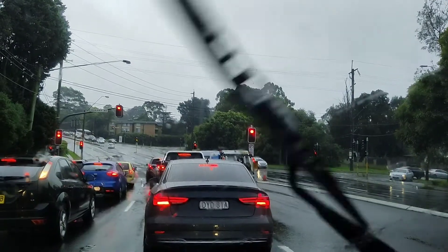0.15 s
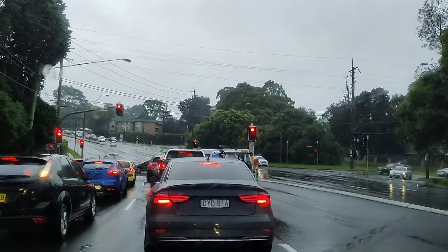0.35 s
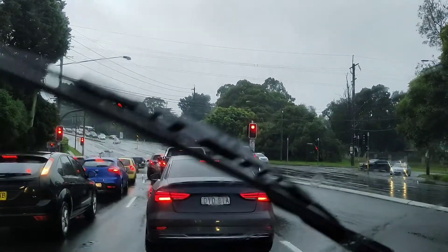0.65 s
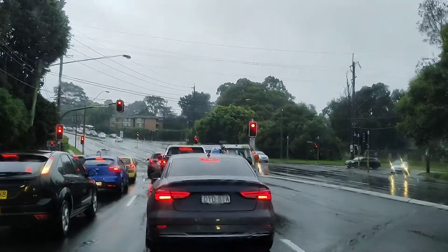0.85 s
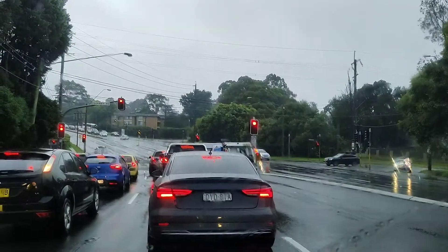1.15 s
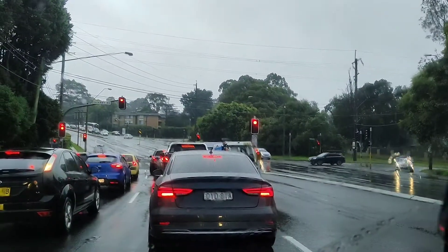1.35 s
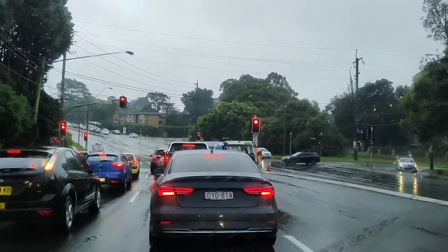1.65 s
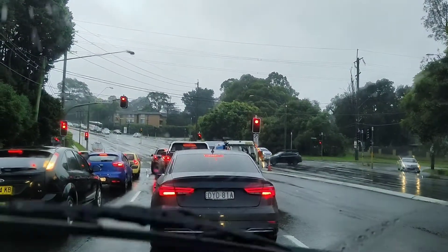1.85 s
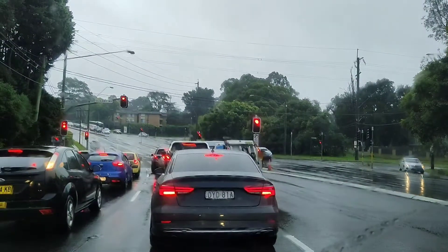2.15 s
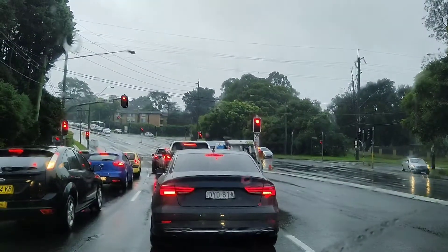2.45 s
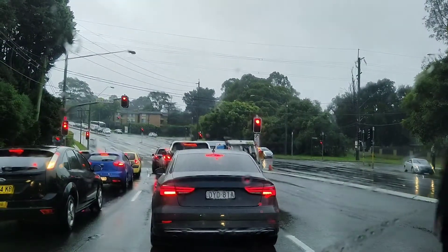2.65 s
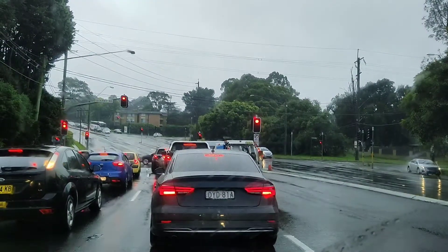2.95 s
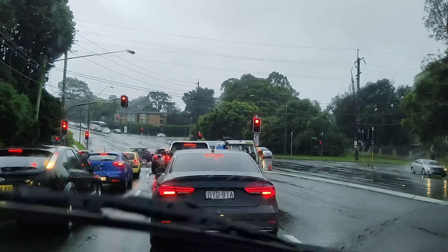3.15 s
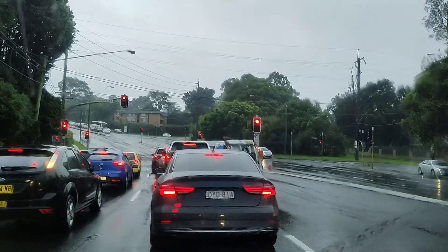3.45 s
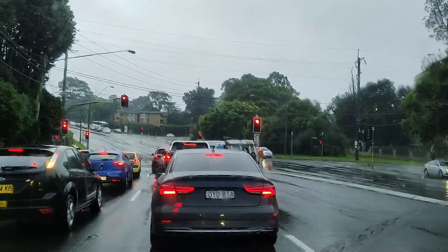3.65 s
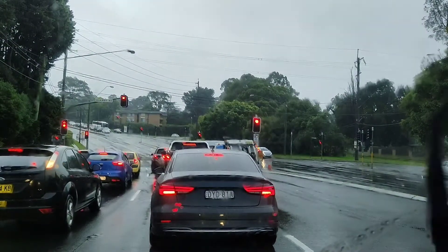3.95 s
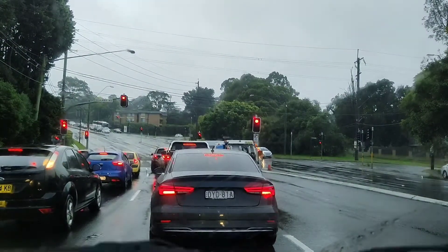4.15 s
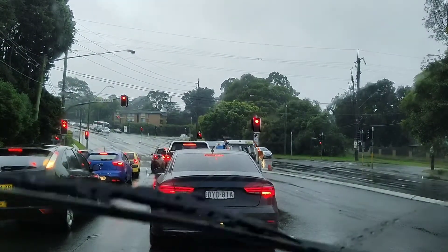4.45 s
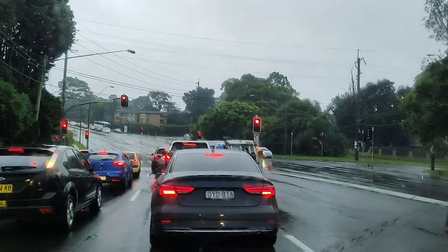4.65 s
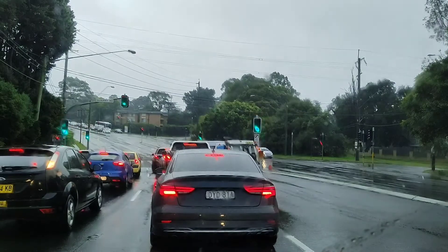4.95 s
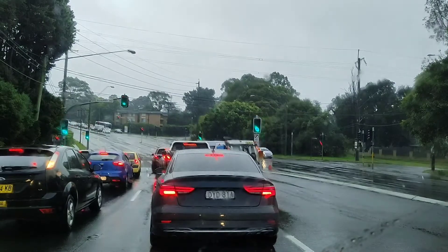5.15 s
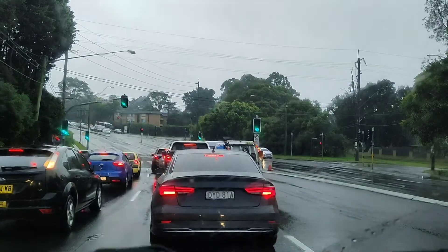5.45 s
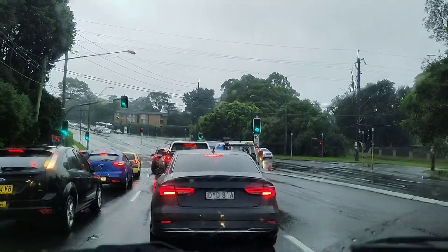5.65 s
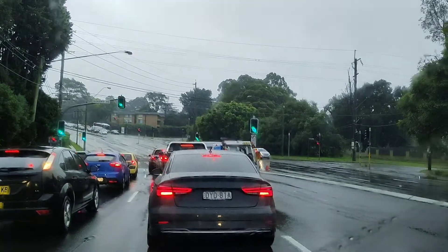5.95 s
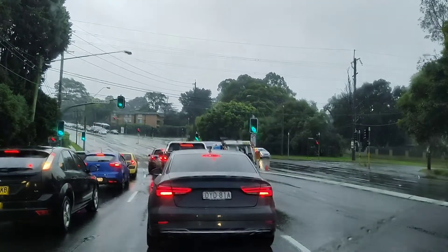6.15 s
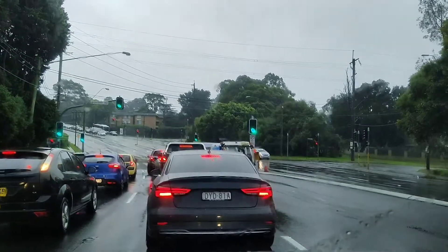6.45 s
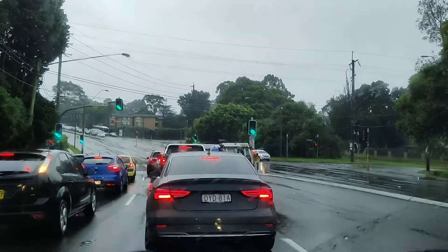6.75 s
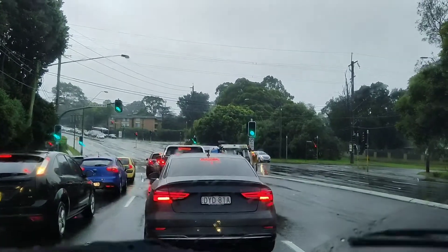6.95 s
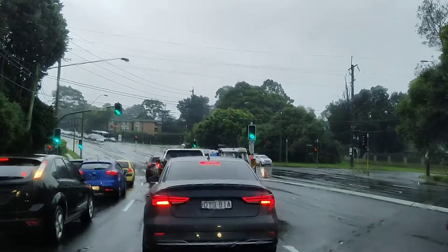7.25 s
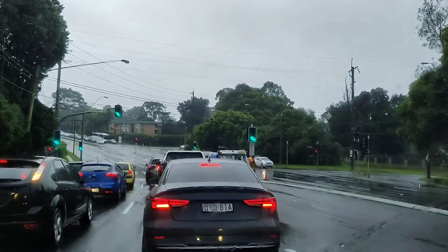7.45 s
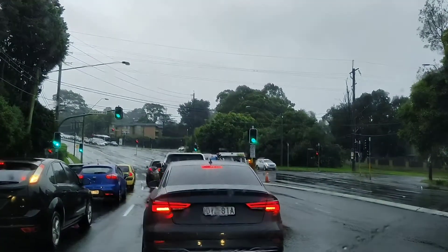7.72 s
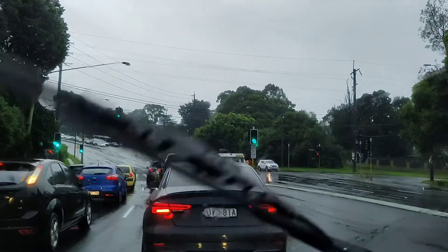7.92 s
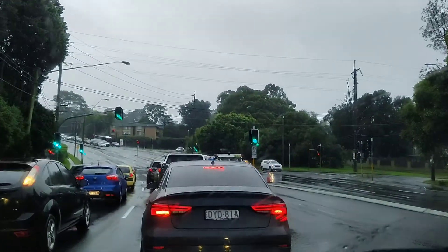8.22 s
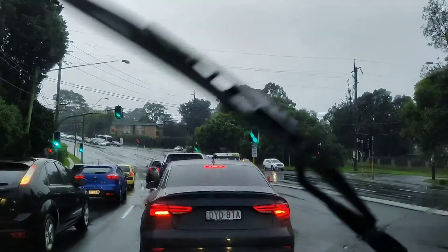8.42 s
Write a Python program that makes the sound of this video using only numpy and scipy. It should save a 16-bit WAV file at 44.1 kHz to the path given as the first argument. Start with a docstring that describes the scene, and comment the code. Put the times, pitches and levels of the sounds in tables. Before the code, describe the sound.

Close, dry car interior in rain, stationary, with a low wavering engine boom near 50 Hz and soft blower rush throughout, plus a very faint whine. A soft wiper rebound opens it, with small finger clicks on the right at 0.13 to 0.23 s. The wiper rubber judders briefly and the arms thump, bounce and rattle at about 1.2, 2.5, 3.8, 5.05, 6.35 and 7.65 s, the last two strongest. Midway between thumps come a small linkage knock, a low motor hum that swells, and two dull blade turns; wet blades hiss faintly. Sparse drops tick at 0.5, 1.6, 3.05, 4.9, 5.8, 6.3 and 6.9 s. Soft skin brushing starts near 6.35 s, then finger taps thicken from 6.5 to 7.55 s, with a stick-slip creak slowing from 6.9 to 7.4 s, close right. A last touch comes at 7.8 s; right-side treble becomes duller until the end at about 8.6 s.

```python
"""A last soft rebound of the wiper arms opens on an idling car in the rain, engine and blower underneath.
Fingers tap, brush and later creak on the phone: uneven slips drive its case, mostly at the right port.
The wipers cycle about every 1.3 s: at the top the rubber judders over on its edge (filtered impacts), then
the arms thump and rebound (short pushes into damped modes); at the bottom two dull blade turns and a
labouring linkage (filtered noise and hum). A few drops tick on the glass as brief noise bursts."""
import sys
import numpy as np
from scipy import signal
from scipy.fft import rfft, irfft
from scipy.io import wavfile
from scipy.ndimage import uniform_filter1d

SR = 44100
rng = np.random.default_rng(int(sys.argv[2]) if len(sys.argv) > 2 else 0)


def transcribe(u):
    """Save the signal u as a 16-bit wav file named by the first command-line argument.

    u: samples, shape (n,) or (channels, n), limited to [-1, 1]; the rate is SR.
    q: integer samples, one column per channel.
    """
    v = np.clip(np.atleast_2d(u).T, -1, 1)
    q = np.round(v * 32767).astype(np.int16)
    wavfile.write(sys.argv[1], SR, q)


N = 378598
TIME = np.arange(N) / SR

# engine and blower spectrum: f/Hz, level/dB
BLOWER_SPECTRUM = [(24, -1), (33, 0.5), (48, -1), (64, -0.5), (80, -14), (105, -3.5), (300, -15),
                   (650, -27.5), (1200, -30), (2300, -29), (3050, -27), (4100, -38), (5200, -60),
                   (6200, -53.5), (8000, -73)]
# airy top of the blower: f/Hz, level/dB
AIR_SPECTRUM = [(7000, -41), (8500, -5), (10200, 0), (12000, -10), (15000, -19)]
# balance of the two ports: f/Hz, left minus right/dB
PORT_BALANCE = [(100, 0.5), (500, 3.5), (1000, -0.5), (1600, 0.5), (2300, 0.5), (3100, -11), (4500, -7),
                (6200, -14.5), (9000, -1.5)]

# one row per wiper cycle, from the flip at the top of the sweep: flip t/s, grip held/s, landing t/s,
# landing level/dB, contact time/s, rebound level/dB, first blade's bottom turn level/dB,
# second blade's bottom turn level/dB, linkage load level/dB
STROKES = [(-.09, .02, -.058, -9, .0018, -8, -43, -42, 0),
           (1.172, .022, 1.211, -.5, .0012, -13, -42, -45, 1),
           (2.467, .015, 2.487, -2, .0005, -8, -42.5, -46, -1.5),
           (3.752, .02, 3.78, -4, .0011, -10, -42, -46, 0),
           (5.04, .021, 5.056, -3, .0008, -3.5, -44, -44.5, -1.5),
           (6.33, .022, 6.363, 0, .0014, -10, -40, -39, 1.5),
           (7.616, .02, 7.645, 1, .0018, -7, -42, -34, 2.5)]
# windscreen and cabin modes: f/Hz, t60/s, left level/dB, right level/dB
SCREEN_MODES = [(92.6, 0.3, -17.5, -26.5), (129.9, 0.28, -10, -17.5), (164.7, 0.25, -8.5, -15.5),
                (213.2, 0.14, 1, -4), (251.4, 0.059, 0.5, -8.5), (303, 0.075, -20.5, -8),
                (360.4, 0.096, -3.5, -7), (476, .08, -11.5, -11.5), (614, .05, -11.5, -20),
                (793, 0.12, -5, -4.5), (868, 0.12, -5, -13.5)]
# dull shudder of the rubber-mounted arms: f/Hz, level/dB
SHUDDER_SPECTRUM = [(70, -11), (115, 1.5), (230, 0), (370, -7), (490, -12), (680, -23.5), (850, -20.5),
                    (1300, -37.5), (4000, -66)]
# rattle of the arms and turning of the blades: f/Hz, level/dB
ARM_SPECTRUM = [(110, -12), (190, -4), (270, 4), (380, -6.5), (500, -3), (680, -22.5), (850, -6.5),
                (1150, -25), (1700, -12), (3000, -35.5), (6000, -83)]
# rumble of the wiper linkage: f/Hz, level/dB
LINKAGE_SPECTRUM = [(70, -37), (110, -10.5), (150, 6), (185, 5.5), (230, -1.5), (330, -11), (480, -15),
                    (700, -30.5), (1500, -62)]
# blade and arm modes: f/Hz, t60/s, left level/dB, right level/dB
BLADE_MODES = [(372, 0.14, -19, -10), (462, 0.14, -4.5, -2.5), (735, 0.021, -5.5, -18),
               (839, 0.058, -0.5, -1), (1606, 0.037, 4.5, -12), (1822, 0.014, 6, 3), (1940, 0.076, -7, -7),
               (2496, 0.026, -33, -8), (2884, .04, -4.5, -17.5), (3078, 0.044, -12.5, -8.5),
               (3200, 0.044, -15, -8.5), (4430, 0.11, -23, -21.5), (5700, 0.044, -40.5, -32)]
# rubber scrubbing over on the glass: f/Hz, level/dB
SCRUB_SPECTRUM = [(70, -28), (150, -18), (235, 11.5), (310, -2), (490, -1.5), (610, -11), (790, 0.5),
                  (1080, -14), (1650, -6), (2350, -11), (3150, -13), (4200, -23.5), (5300, -40),
                  (6100, -40), (8000, -54), (15000, -70)]

# heavier drops on the glass: t/s, level/dB
DROPS = [(.4975, -20), (1.583, -33), (1.690, -31), (3.053, -31), (4.866, -33), (4.963, -34), (5.83, -27),
         (6.318, -19), (6.914, -18)]
# splash of a drop: f/Hz, level/dB
SPLASH_SPECTRUM = [(1000, -5), (2800, -16.5), (3900, 4), (5000, -12.5), (6200, -7), (8000, -21.5),
                   (15000, -34.5)]

# fingers on the phone: t/s, click level/dB, thud level/dB, time scale of the run of slips/s
TAPS = [(0.1348, 1, -3.5, 0.00003), (0.144, -24, -8.5, 0.0022), (.229, -29, -12, 0.0019),
        (6.504, -16, -13.5, 0.0032), (6.746, -14, -7, 0.0066), (6.812, -7, -4, 0.0056),
        (6.912, -10, -26, 0.0001), (7.012, -11, -5, 0.0025), (7.058, -4, -1, 0.0084),
        (7.122, -16, -1, 0.0015), (7.141, -11, -1, .002), (7.215, -5.5, 2, .004), (7.258, -4, 5, 0.0042),
        (7.348, -9.5, 1, 0.0039), (7.378, -2, 5.5, 0.0056), (7.488, -13, -4.5, .001),
        (7.512, -11, -6, 0.00056), (7.537, -16, -5.5, .005), (7.809, -16.5, -10, 0.000775)]
# sharp part of a touch: f/Hz, level/dB
CLICK_SPECTRUM = [(200, -24.5), (780, 8.5), (1200, 1.5), (2100, 1), (3100, -5.5), (4600, -13),
                  (6100, -18.5), (8200, -44), (11000, -17.5), (13000, -29), (15500, -50)]
# soft part of a touch: f/Hz, level/dB
THUD_SPECTRUM = [(60, -19.5), (150, -11), (215, -1.5), (330, -0.5), (470, -7.5), (680, -7), (1100, -17.5),
                 (3000, -68.5)]
# skin slides on the case: t/s, level/dB, half length/s
BRUSHES = [(.148, -48, 0.015), (.55, -56.5, 0.068), (.9, -53, .03), (6.354, -43.5, 0.044),
           (6.52, -40.5, 0.019), (6.58, -47, 0.038), (6.752, -39, 0.019), (6.821, -37, 0.014),
           (7.006, -57.5, 0.26), (7.27, -42.5, 0.017)]
# hiss of sliding skin: f/Hz, level/dB
SKIN_SPECTRUM = [(500, 1.5), (2000, 2.5), (4000, 1), (5200, -12), (6300, -10), (8500, -27), (11000, -18),
                 (12700, -22), (15000, -30)]
# the phone's case rings briefly after a touch: f/Hz, t60/s, left level/dB, right level/dB
CASE_MODES = [(209, 0.083, -43, -18), (302, 0.057, -47, -19.5), (780, 0.017, -42, -7.5),
              (1480, .005, -33, -1), (2020, 0.0058, -49, -6.5), (3000, 0.0079, -32, -6.5),
              (6050, 0.006, -50, -23), (11080, 0.0042, -56, -22.5)]
# a finger comes to rest over the right port: t/s, share covered
COVER = [(6.9, 0), (7.4, 0.45), (7.75, 0.95), (8.58, 1)]

# after landing the arm bounces once (level relative to the landing), then rebounds softly and rattles
BOUNCE_S, BOUNCE_DB, BOUNCE_CONTACT_S = .018, -7, .0019
REBOUND_S, REBOUND_CONTACT_S, SHUDDER_S = .058, .0036, .037
RATTLE_DB, RATTLE_S = -42, .022
# the linkage knocks as it takes up its play, counted from the flip
PLAY_S, PLAY_DB, PLAY_CONTACT_S = .666, -15.5, .0013
# the two blades turn at the bottom one after the other, counted from the flip
FIRST_TURN_S, SECOND_TURN_S, TURN_HALF_S = .675, .738, .028
# the linkage rumbles least at the top and labours as it starts to lift the arms again
RUMBLE_DB, SWING_DB = -51, 6
LIFT_DB, LIFT_ATTACK_S, LIFT_RELEASE_S = -45, .03, .17
# the blades rub all the time and swish at mid-glass, down then up: t after the flip/s, level/dB, half length/s
FRICTION_DB, SWISHES = -56.5, [(.41, -54, .04), (.97, -59, .06)]
# the rubber takes hold and lets go
FLIP_DB, FLIP_ATTACK_S, FLIP_RELEASE_S = -24, .011, .021
# skin sticks and slips on the case at a slowing rate
CREAK_START_S, CREAK_END_S = 6.925, 7.42
SLIPS_PER_S, SLOWING_S = 108, .36
# the sharp edge of the slips fades first; their soft push comes later and lasts
CREAK_CLICK_DB, CREAK_FADE_DB_PER_S = -8.5, 34
CREAK_THUD_DB, CREAK_PUSH_S, CREAK_ATTACK_S, CREAK_RELEASE_S = -10.5, 7.02, .09, .29
TOP_HZ = 15700  # upper limit of the phone


def amp(db):
    """Decibels to gain."""
    return 10 ** (np.asarray(db) / 20)


def unit(x):
    """Scale to rms 1."""
    return x / np.sqrt(np.mean(x ** 2))


def convolve(x, response):
    """Send a sound through one response, or one per ear."""
    return signal.fftconvolve(np.atleast_2d(x), np.atleast_2d(response), axes=1)[:, :N]


def shape(points, hz):
    """Read (f/Hz, level/dB) points on a log-frequency axis."""
    f, db = np.transpose(points)
    return np.interp(np.log(hz + 1), np.log(f), db)


def colour(x, points, size=8192):
    """Causal (minimum-phase) filter of unit energy that follows the given spectrum."""
    level_db = shape(points, np.fft.rfftfreq(size, 1 / SR))
    cepstrum = irfft(np.log(amp(level_db)))
    # folding the cepstrum forward in time makes the filter causal
    cepstrum[1:size // 2] *= 2
    cepstrum[size // 2 + 1:] = 0
    response = irfft(np.exp(rfft(cepstrum)))
    return convolve(x, response / np.linalg.norm(response))


def ring(x, modes):
    """Damped modes, each with its own strength at the two ears; unit energy on average per ear."""
    t = TIME[:SR // 2]
    response = 0
    for k, (hz, t60, left, right) in enumerate(modes):
        decay = np.exp(-np.log(1000) * t / t60)
        sign = (-1) ** k  # neighbouring modes start in opposite directions
        response = response + sign * amp([[left], [right]]) * np.sin(2 * np.pi * hz * t) * decay
    return convolve(x, response / np.sqrt(np.sum(response ** 2) / 2))


def diffuse(pair, split_hz):
    """Two unrelated sounds as a cabin field: bass alike at both ports, treble unrelated, port-coloured."""
    hz = np.fft.rfftfreq(N, 1 / SR)
    alike = 1 / (1 + (hz / split_hz) ** 2)
    mid, side = rfft(pair)
    sign = np.array([[1], [-1]])
    field = mid * np.sqrt((1 + alike) / 2) + sign * side * np.sqrt((1 - alike) / 2)
    port_gain = amp(sign * shape(PORT_BALANCE, hz) / 2)
    return irfft(field * port_gain, N)


def noise(channels=2):
    """White noise."""
    return rng.standard_normal((channels, N))


def walk(rate):
    """Smooth random wander of rms 1, with about rate new values per second."""
    k = int(SR / rate)
    steps = rng.standard_normal(N)[np.arange(N) // k]
    return unit(uniform_filter1d(uniform_filter1d(steps, k), k))


def grit(rate, spread_db):
    """Random tiny impacts of uneven size, rate per second, brought to rms 1."""
    hits = rng.random((2, N)) < rate / SR
    return unit(hits * noise() * amp(spread_db * noise()))


def fade(start, length):
    """An envelope that jumps to 1 and dies away."""
    age = TIME - start
    return (age >= 0) * np.exp(-np.clip(age / length, 0, 50))


def press(start, attack, hold, release):
    """An envelope that has risen to 1 at its start, holds, and lets go."""
    age = TIME - start
    rise = (np.minimum(age, 0) / attack) ** 2
    fall = (np.maximum(age - hold, 0) / release) ** 2
    return np.exp(-rise - fall)


def swells(table):
    """Bell-shaped envelopes from rows of t/s, level/dB, half length/s."""
    return sum(amp(db) * np.exp(-((TIME - s) / half) ** 2) for s, db, half in table)


def wavering_tone(hz, drift, rate):
    """A sine whose pitch wanders by a fraction drift (rms)."""
    return np.sin(2 * np.pi * np.cumsum(hz * (1 + drift * walk(rate))) / SR)


def engine():
    """The idling engine booms as one low tone, wavering in pitch and level."""
    return amp(2 * walk(5.7)) * wavering_tone(48.6, drift=.015, rate=6.7)


def blower():
    """Unsteady broadband cabin noise under a steady airy top."""
    rush = amp(-41.0) * colour(noise() * amp(1.9 * walk(9)), BLOWER_SPECTRUM)
    air = amp(-89) * colour(noise(), AIR_SPECTRUM)
    return diffuse(rush + air, split_hz=610)


def blower_whine():
    """The blower whines faintly on one wavering tone."""
    return amp(1.3 * walk(5)) * wavering_tone(1090, drift=0.0037, rate=6)


def cabin():
    """Engine and blower, the whine a little stronger at the right."""
    return blower() + amp(-48.5) * engine() + amp([[-78], [-71]]) * blower_whine()


def blows():
    """Landing, bounce, rebound and linkage knock of each cycle: rows of t/s, level/dB, contact time/s."""
    rows = []
    for flip, _, landing, db, contact, rebound_db, *_ in STROKES:
        rows += [(landing, db, contact),
                 (landing + BOUNCE_S, db + BOUNCE_DB, BOUNCE_CONTACT_S),
                 (landing + REBOUND_S, rebound_db, REBOUND_CONTACT_S),
                 (flip + PLAY_S, PLAY_DB, PLAY_CONTACT_S)]
    return rows


def thumps():
    """Each blow pushes the windscreen; the rubber-mounted arms shudder dully after it."""
    push, shudder = np.zeros(N), np.zeros(N)
    for s, db, contact in blows():
        # half-sine force; a shorter contact is stronger, so the impulse depends on level alone
        force = np.sin(np.pi * np.clip((TIME - s) / contact, 0, 1))
        push += amp(db) * force * np.pi / (2 * contact * SR)
        shudder += amp(db) * fade(s, length=SHUDDER_S)
    dull = diffuse(colour(shudder * noise(), SHUDDER_SPECTRUM), split_hz=500)
    return amp(8.0) * ring(push, SCREEN_MODES) + amp(-27) * dull


def arms():
    """The arms rattle as they rebound; low on the glass the blades turn over in water with a dull shudder."""
    shakes = []
    for flip, _, landing, *_, first_db, second_db, _ in STROKES:
        shakes += [(landing + REBOUND_S, RATTLE_DB, RATTLE_S),
                   (flip + FIRST_TURN_S, first_db, TURN_HALF_S),
                   (flip + SECOND_TURN_S, second_db, TURN_HALF_S)]
    rattle = grit(rate=1600, spread_db=2) * swells(shakes)
    return diffuse(colour(rattle, ARM_SPECTRUM), split_hz=1000)


def effort():
    """Linkage load and blade friction follow one course per cycle; the load has its own level each time."""
    starts, *_, linkage_db = np.transpose(STROKES)
    cycle = np.searchsorted(starts, TIME) - 1
    period = np.mean(np.diff(starts))
    swing = np.abs(np.sin(np.pi * (TIME - starts[cycle]) / period))
    lift = sum(press(s + FIRST_TURN_S, LIFT_ATTACK_S, 0, LIFT_RELEASE_S) for s in starts)
    load = amp(linkage_db[cycle]) * (amp(RUMBLE_DB + SWING_DB * swing) + amp(LIFT_DB) * lift)
    swishes = [(s + after, db, half) for s in starts for after, db, half in SWISHES]
    return load, amp(FRICTION_DB) + swells(swishes)


def linkage(load):
    """The loaded linkage rumbles as low, unsteady noise."""
    return diffuse(colour(noise() * load * amp(1.7 * walk(30)), LINKAGE_SPECTRUM), split_hz=670)


def motor(load):
    """The wiper motor hums on two wavering tones that swell with the load."""
    hum = 0
    for hz, db in [(148, -7.5), (182, -5)]:
        waver = amp(4.5 * walk(14))
        hum = hum + amp(db) * waver * wavering_tone(hz, drift=0.02034, rate=16)
    return load * hum


def blade_hiss(friction):
    """The wet blades hiss over the glass: friction noise rings blade and arm."""
    wetness = amp(2.5 * walk(25))
    return ring(noise(channels=1) * friction * wetness, BLADE_MODES)


def sweeps():
    """Linkage, motor and blades at work through the whole sweep."""
    load, friction = effort()
    return amp(-1.5) * linkage(load) + motor(load) + amp(-2) * blade_hiss(friction)


def rain():
    """A few heavier drops, short fading noise bursts, tick over a faint patter of tiny impacts."""
    drops = amp(-83.5) * grit(rate=120, spread_db=-0.5)
    for s, db in DROPS:
        burst = fade(s, length=0.0045) * noise(channels=1)
        drops = drops + amp(db - 21) * burst * amp([[-6], [0]])
    return colour(drops, SPLASH_SPECTRUM)


def taps():
    """Each finger contact is a quick run of small slips; returns the sharp and the soft part of the force."""
    clicks, thuds = np.zeros(N), np.zeros(N)
    for s, click_db, thud_db, length in TAPS:
        chance = rng.random((4, 2))  # four slips: random timing, random size
        moments = s + length * (np.arange(len(chance)) + chance[:, 0]) / 3
        at = (SR * moments).astype(int)
        size = 0.23 + chance[:, 1]
        size = size / np.linalg.norm(size)
        np.add.at(clicks, at, amp(click_db) * size)
        np.add.at(thuds, at, amp(thud_db) * size)
    return clicks, thuds


def creak():
    """Skin sticks and slips at a slowing, uneven rate; sharp and soft force vary from slip to slip."""
    age = np.maximum(TIME - CREAK_START_S, 0)
    rate = SLIPS_PER_S / (1 + (age / SLOWING_S) ** 2)
    click = amp(CREAK_CLICK_DB - CREAK_FADE_DB_PER_S * age)
    thud = amp(CREAK_THUD_DB) * press(CREAK_PUSH_S, CREAK_ATTACK_S, 0, CREAK_RELEASE_S)
    turns = np.cumsum(rate * np.exp(.3 * walk(120))) / SR  # one slip at each whole turn
    releases = np.diff(np.floor(turns), prepend=0)
    # each slip scrapes on for a moment before the skin sticks again
    scrape = np.exp(-(turns % 1) / 0.26) * noise(channels=1)[0]
    sounding = (TIME > CREAK_START_S) * (TIME < CREAK_END_S)
    slips = (releases + amp(-19.5) * scrape) * sounding
    return slips * click * amp(1.7 * walk(100)), slips * thud * amp(3.5 * walk(100))


def bend(x, delay_s=0.000784, at_hz=1000):
    """Bending waves in a thin shell: the treble arrives first, the bass trails (delay_s is met at at_hz)."""
    hz = np.fft.rfftfreq(N, 1 / SR)
    return irfft(rfft(x) * np.exp(-2j * np.pi * 2 * delay_s * np.sqrt(at_hz * hz)), N)


def brushing():
    """Skin slides softly on the case as a dense run of tiny impacts."""
    return colour(swells(BRUSHES) * grit(rate=6000, spread_db=-1)[0], SKIN_SPECTRUM)


def fingers():
    """Taps, creak and soft brushing travel through the case, mostly to the right port."""
    clicks, thuds = bend(np.add(taps(), creak()))
    direct = amp(-3.5) * colour(clicks, CLICK_SPECTRUM) + amp(5.0) * colour(thuds, THUD_SPECTRUM) + brushing()
    return direct * amp([[-25], [0]]) + amp(-4.0) * ring(clicks, CASE_MODES)


def flips():
    """The rubber lip judders across the glass as it rolls over, ringing blade and arm."""
    pressure = amp(FLIP_DB) * sum(press(s, FLIP_ATTACK_S, hold, FLIP_RELEASE_S) for s, hold, *_ in STROKES)
    slips = grit(rate=9000, spread_db=1) * pressure * amp(2.8 * walk(300))
    scrub = diffuse(colour(slips, SCRUB_SPECTRUM), split_hz=540)
    blade = ring(slips[0], BLADE_MODES)
    # the slips also shake the windscreen, which builds up towards the thump
    screen = ring(slips[1], SCREEN_MODES)
    return amp(0.5) * scrub + amp(-4.0) * blade + amp(-5.5) * screen


def from_the_right(pair, lag_s=.00032):
    """The wiper drive sits to the right, so the left port hears it later."""
    hz = np.fft.rfftfreq(N, 1 / SR)
    return irfft(rfft(pair) * np.exp(-2j * np.pi * hz * np.array([[lag_s], [0]])), N)


def shade(x, centre_hz=3900, width_hz=2300):
    """The gap between finger and port traps one band of the treble."""
    trapped = signal.lfilter(*signal.iirpeak(centre_hz, centre_hz / width_hz, fs=SR), x)
    covered = np.clip(np.interp(TIME, *np.transpose(COVER)), 0, 1)
    return x - covered * trapped


def scene():
    """Everything heard from the front seat."""
    wipers = from_the_right(flips() + thumps() + arms() + sweeps())
    return wipers + cabin() + rain() + fingers()


def record(dry):
    """The phone, its right port gradually covered, drops the deepest bass and cuts the top."""
    ports = [dry[0], shade(dry[1])]
    no_deep_bass = signal.sosfilt(signal.butter(2, 14, "high", fs=SR, output="sos"), ports)
    return signal.sosfilt(signal.ellip(8, .2, 70, TOP_HZ, fs=SR, output="sos"), no_deep_bass)


dry = scene()
out = record(dry)
transcribe(out)
```